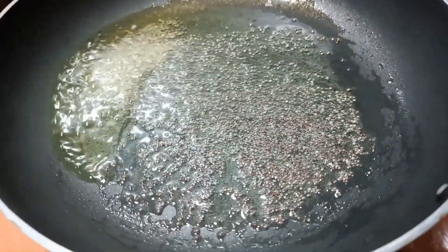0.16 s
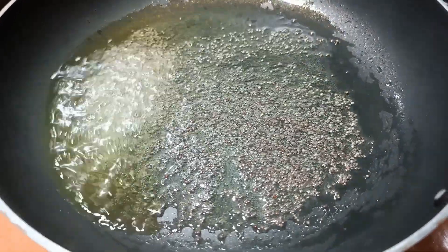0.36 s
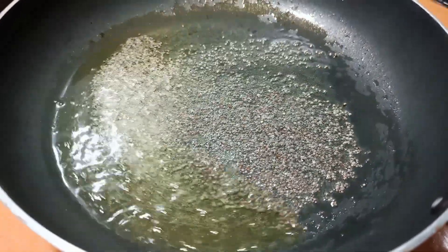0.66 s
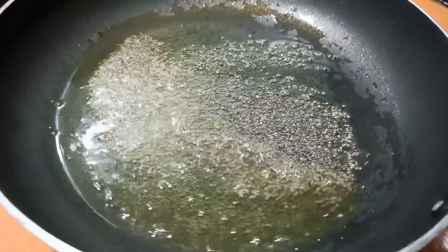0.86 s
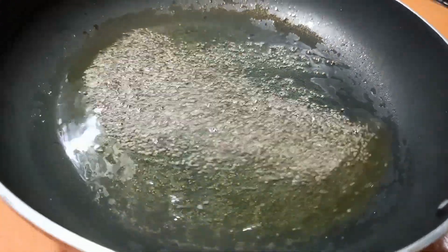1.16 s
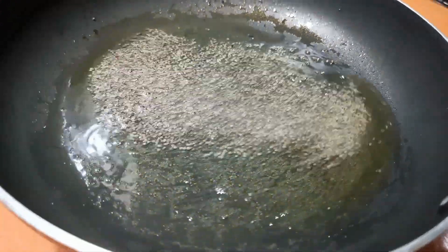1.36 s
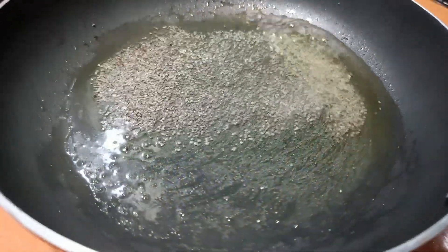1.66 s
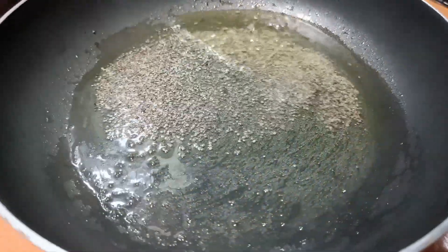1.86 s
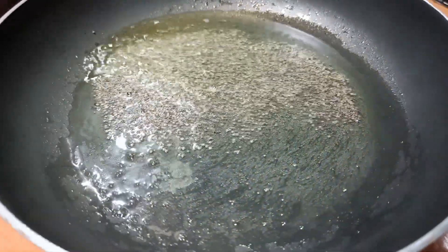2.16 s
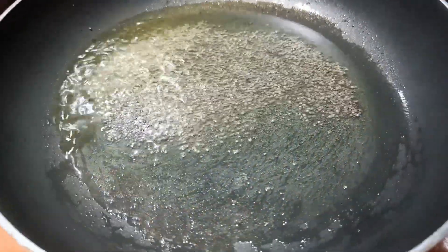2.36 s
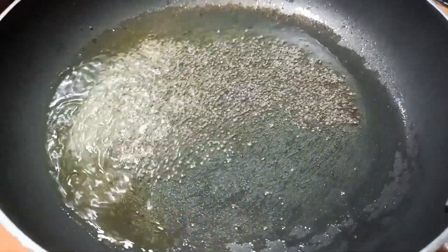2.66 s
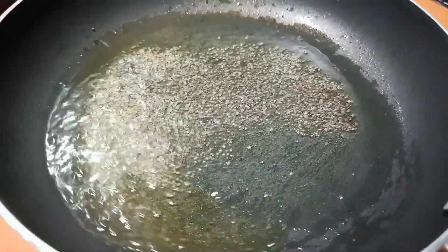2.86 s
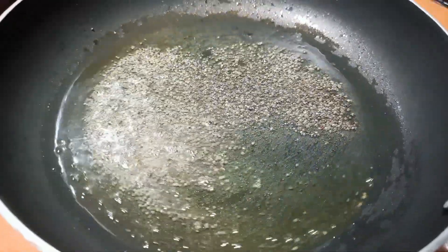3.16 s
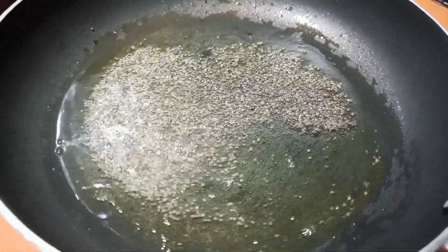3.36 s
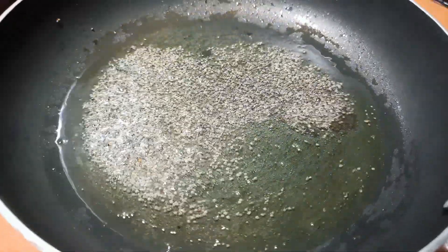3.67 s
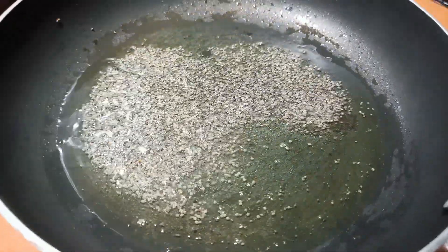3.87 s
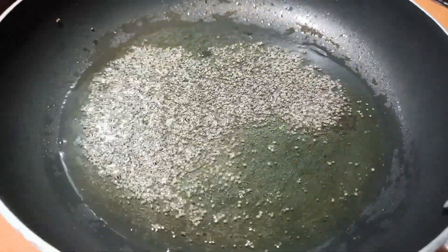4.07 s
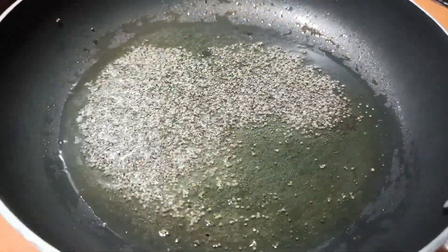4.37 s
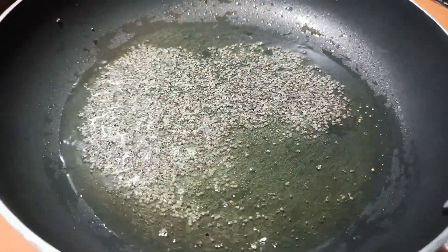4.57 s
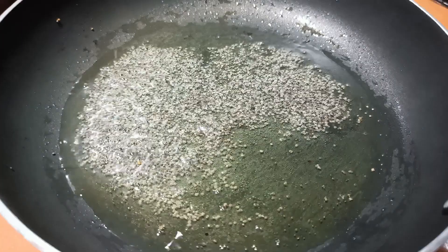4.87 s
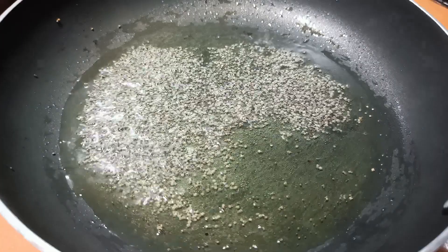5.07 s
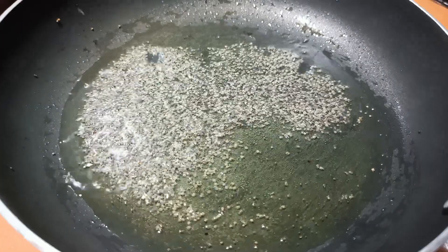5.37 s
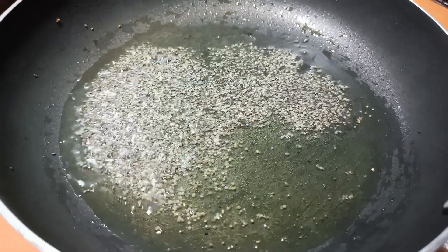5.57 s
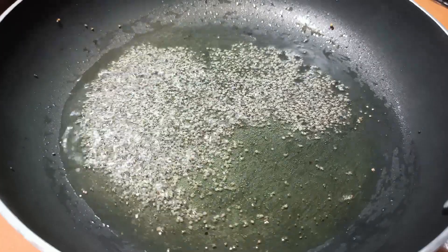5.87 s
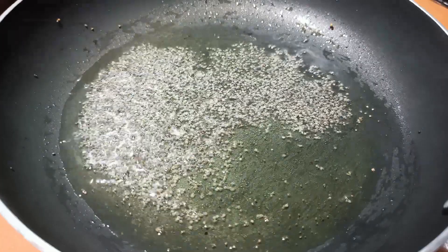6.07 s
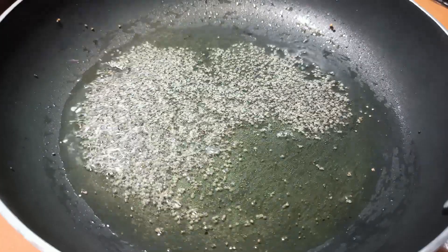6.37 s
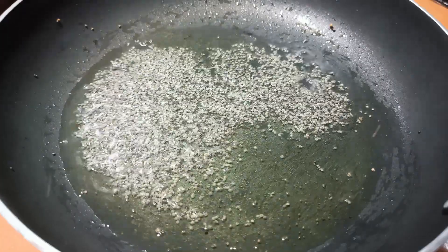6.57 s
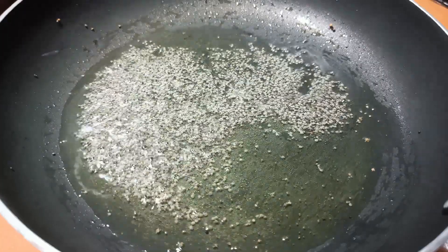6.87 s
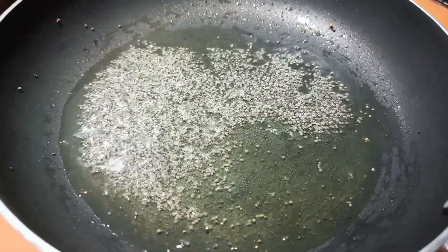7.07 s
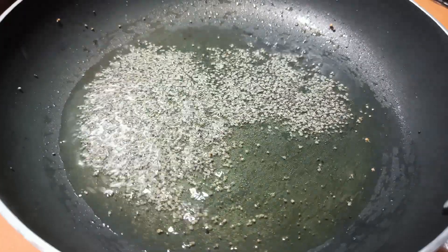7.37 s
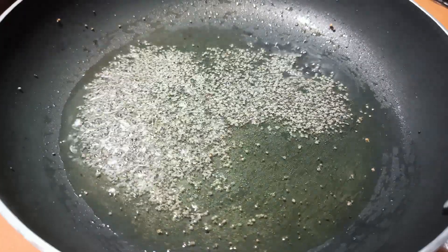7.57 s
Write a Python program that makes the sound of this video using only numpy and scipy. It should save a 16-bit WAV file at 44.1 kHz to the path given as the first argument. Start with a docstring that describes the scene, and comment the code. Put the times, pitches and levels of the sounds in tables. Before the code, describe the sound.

Mustard seeds pop in hot oil, sparse at first with pan knocks and wet plinks, then thickening into a dense, sharp crackle.

```python
"""Mustard seeds in a tilted pan

Two microphones close over a frying pan of hot oil, tilted about on the stove and then left to stand.
The pan knocks on the grate and rings in its modes; steam bubbles plink as gliding tones with noisy splashes.
Seeds burst as short coloured noise, singly at first, then in a dense crackle over a sizzle of noise grains.
The hardest bursts overload the microphones, which answer with a low thump; a small kitchen rings behind."""
import sys
import numpy as np
from scipy import signal
from scipy.fft import rfft, irfft
from scipy.io import wavfile
from scipy.ndimage import uniform_filter1d

SR = 44100
rng = np.random.default_rng(int(sys.argv[2]) if len(sys.argv) > 2 else 0)


def unload_wav(signal):
    """Save mono or channel-first audio to the path in sys.argv[1] as 16-bit WAV at rate SR, clipped to [-1, 1]."""
    wavfile.write(
        sys.argv[1],
        SR,
        np.round(np.clip(np.atleast_2d(signal).T, -1, 1) * 32767).astype(np.int16),
    )


N = 340881   # samples
SNIPPET = 4096   # samples in one short sound
MIC_LIMIT_DB = -25.5   # a push above this overloads a microphone

# seeds that burst out in front: t/s, crack level/dB before trim, crack left over right/dB, steam push/dB
BURSTS = [(0.1577, -54, 5, -55.5), (0.3126, -30, 1, -38.5), (0.3963, -30.5, -2, -32),
          (0.4623, -26.5, 7, -9), (0.495, -36.5, -8, -58), (1.0436, -35.5, 3, -42),
          (1.1571, -29, -3.5, -33.5), (1.2112, -37.5, 4, -34.5), (1.3503, -33, -2.5, -32.5),
          (1.629, -31, -3.5, -24.5), (1.7411, -31.5, 0, -29), (1.9701, -32.5, 0, -35),
          (2.0161, -32.5, 2.5, -34), (2.2461, -24, -1, -21.5), (2.6177, -41.5, -5.5, -44.5),
          (2.7848, -38, 12.5, -38.5), (2.8597, -38, 2, -33), (2.8893, -33, 0, -25),
          (2.9571, -21, -0.5, -14), (2.9813, -29, 0, -30.5), (3.0137, -25.5, -0.5, -28.5),
          (3.0484, -34, -0.5, -37.5), (3.257, -55, -0.5, -66.5), (3.4647, -56, -1.5, -54.5),
          (3.5738, -32, -4, -34), (3.9236, -51.5, 2, -63.5), (3.971, -47, 7.5, -72),
          (4.0022, -40, -1, -44.5), (4.0302, -38.5, 2, -40.5), (4.1193, -23.5, 7.5, -9.7),
          (4.2705, -26, 0, -19.5), (4.3787, -35, -4, -31), (4.411, -30, -3, -35.5), (4.456, -30, 6, -34),
          (4.4835, -23.5, 0, -22), (4.5567, -18.5, -1, -19), (4.5772, -29, 20.5, -10),
          (4.5896, -25, 1, -24), (4.6425, -29.5, 0, -8.5), (4.7495, -29.5, 3, -19.5),
          (4.8233, -19.5, 5, -26.5), (4.8467, -28.5, -5, -28), (4.92, -37, -3, -33.5),
          (5.012, -31, 7, -34.5), (5.063, -32, 7, -39.5), (5.1497, -22, 12.5, -26.5),
          (5.155, -24, 2, -32.5), (5.2237, -26, 1, -29.5), (5.2454, -20.5, 9, -10.5),
          (5.257, -27, -3, -9.5), (5.3282, -24.5, 3, -27.5), (5.3804, -29.5, 12.5, -27),
          (5.4363, -20, -5, -26), (5.4969, -32, 13.5, -28), (5.5455, -31, 0, -20.5),
          (5.6625, -23.5, 7, -29), (5.6667, -20, 7, -8), (5.6877, -19, -4, -13.5), (5.7212, -26, 10, -11.5),
          (5.7596, -22, 4, -19), (5.82, -25.5, 3, -30.5), (5.8463, -21, -0.5, -19), (5.889, -29, 17, -8.5),
          (5.962, -24.5, 0.5, -12), (6.0619, -25.5, 5, -12), (6.1006, -27.5, 5, -30),
          (6.2075, -20, -2, -23.5), (6.234, -27, 1, -24), (6.2656, -27.5, 0, -25), (6.3423, -32.5, -3, -34),
          (6.3861, -24.5, 0, -24), (6.3965, -22.5, -7.5, -23.5), (6.4, -26, 9, -8.5),
          (6.459, -20, 4, -20.5), (6.4878, -26, -1, -26.5), (6.5251, -24, 2, -24), (6.5795, -19, -1, -19.5),
          (6.5952, -25, 6, -32), (6.63, -31.5, -12, -6), (6.7085, -25.5, -4, -7), (6.8125, -27, -1, -16.5),
          (6.8281, -25, -3.5, -11), (6.8562, -24.5, 1, -20.5), (6.876, -24.5, -3, -21),
          (6.9564, -31.5, 9, -37), (7.0044, -33, 5, -9.5), (7.037, -26.5, 12, -7.5),
          (7.1017, -28.5, 16, -8.4), (7.1783, -28, 7, -8.5), (7.1812, -27.5, 7, -10),
          (7.2148, -30.5, 3, -27), (7.25, -20.5, -1, -12), (7.3469, -27, 3, -33.5), (7.4136, -21, 1, -26),
          (7.437, -25.5, -0.5, -7.5), (7.445, -32, 15, -10.5), (7.5217, -22, 3, -9.6),
          (7.5787, -24, 0, -13), (7.6344, -28, -1, -32)]
# ringing modes of the pan: f/Hz, strength when knocked/dB, strength under bursts and bubbles/dB, t60/s
PAN_MODES = [(341.4, -13.5, -62, 0.29), (406, -20, -60, 0.31), (519, -16.5, -58, 0.34),
             (706, -17, -48, 0.06), (807, -13.5, -48.5, 0.28), (850, -11, -47, 0.21),
             (1250, -18, -26.5, 0.21), (1280, -6, -35, 0.24), (1413, -13.5, -47.5, 0.24),
             (1490, -16, -42, 0.077), (1932, -22, -24, 0.28), (1990, -12.5, -32.5, 0.25),
             (2306, -27.5, -53.5, 0.2), (2780, -24, -29.5, 0.36)]
# how freely the pan rings, lifted off the grate or resting on it: t/s, level/dB
FREEDOM = [(0, -6), (0.9, -11.5), (1.15, -0.5), (2.35, 3.5), (2.9, 3.5), (3.6, -20), (4.2, -8), (7.73, -14)]
# spectrum of a burst's body and of the sizzle's blips: f/Hz, relative level/dB per Hz
BODY_SPECTRUM = [(100, -8), (500, -5), (1000, -5.5), (1500, 10.5), (2300, 5), (3100, 0), (4200, 4),
                 (5400, 3), (7000, -6.5), (12000, -34)]
# spectrum of the sizzle's ticks and of a bubble's snap: f/Hz, relative level/dB per Hz
HISS_SPECTRUM = [(200, -13.5), (800, -11.5), (1500, -8.5), (3000, -11.5), (4500, -7.5), (6700, -8.5),
                 (8700, 10.5), (11000, -2.5), (12600, -1), (14000, -5.5), (15600, -5), (17000, -16)]


def from_db(db):
    """Decibels to amplitude."""
    return 10 ** (np.asarray(db) / 20)


def rms_one(x):
    """Scale to rms 1 over all samples and channels."""
    return x / np.sqrt(np.mean(x ** 2) + 1e-20)


def over_time(points, s):
    """Read a table of times and values at the given times."""
    return np.interp(s, *np.transpose(points))


def at_hz(points, hz):
    """Read a table on a log-frequency axis."""
    known_hz, values = np.transpose(points)
    return np.interp(np.log(hz + 1), np.log(known_hz), values)


def colour(x, spectrum, size=1024):
    """Causal (minimum-phase) filter with the given spectrum."""
    gain = from_db(at_hz(spectrum, np.fft.rfftfreq(size, 1 / SR)))
    cepstrum = irfft(np.log(gain))
    # folding the cepstrum onto positive time gives minimum phase
    cepstrum[1:size // 2] *= 2
    cepstrum[size // 2 + 1:] = 0
    response = irfft(np.exp(rfft(cepstrum)))
    return signal.fftconvolve(np.atleast_2d(x), response[None], axes=1)[:, :x.shape[-1]]


def stereo_noise(length, alike):
    """Two white noises that share a part of their power, from 0 (separate) to 1 (the same)."""
    shared, *own = rng.standard_normal((3, length))
    alike = np.clip(alike, 0, 1)
    return np.sqrt(alike) * shared + np.sqrt(1 - alike) * np.array(own)


def unit_attack(x, size=132):
    """Scale each row to rms 1 over its first samples (3 ms unless given)."""
    return x / np.sqrt(np.mean(x[..., :size] ** 2, axis=-1, keepdims=True) + 1e-20)


def add(out, s, sound):
    """Mix a short sound in at a time."""
    start = max(round(s * SR), 0)
    part = out[..., start:start + sound.shape[-1]]
    part += sound[..., :part.shape[-1]]


def balance(db):
    """Left and right gains that differ by this many dB."""
    return from_db(np.array([[db], [-db]]) / 2)


def pan_ring(times, blow_db, mode_db):
    """Each blow sets every mode of the pan ringing, with a strength that scatters from blow to blow."""
    out = np.zeros((2, N))
    at = (np.array(times) * SR).astype(int)
    for k, ((hz, _, _, t60), db) in enumerate(zip(PAN_MODES, mode_db)):
        scatter_db = 2 * rng.standard_normal((len(at), 2)).T
        clicks = np.zeros((2, N))
        clicks[:, at] = from_db(blow_db + db + scatter_db) * (-1) ** k
        # two-pole resonator: a decaying sine after each click
        r = from_db(-60 / (t60 * SR))
        w = 2 * np.pi * hz / SR
        out += signal.lfilter([0, np.sin(w)], [1, -2 * r * np.cos(w), r * r], clicks + 1e-18)
    return out


def heat(s):
    """How far the seeds have come to the burst at these times, 0 to 1."""
    # t/s, heat (0 = the first stray pops, 1 = full crackle)
    heating = [(0, 0), (3.75, 0.052), (3.98, 0.55), (5.1, 0.7), (5.8, 0.96), (7.73, 0.93)]
    return over_time(heating, s)


def grains(per_s, spread_db, grain_s):
    """Random bursts of decaying noise, mostly small and now and then large."""
    starts = rng.random(N) < per_s / SR
    sizes = from_db(spread_db * np.minimum(rng.exponential(1, N), 3)) * starts
    power = signal.lfilter([1], [1, -np.exp(-2 / (grain_s * SR))], sizes ** 2 + 1e-18)
    return np.sqrt(power) * stereo_noise(N, alike=.15)


def sizzle():
    """Tiny bubbles burst around the seeds: bright ticks and fewer, deeper blips, rising with heat and sloshes."""
    # tilted oil runs over bare hot metal and the sizzle swells: t/s of the peak, level/dB before mix, rise/s
    sloshes = [(2.2, -62, 0.69), (3.0, -50.5, 0.22)]
    full_db, cold_db = -52, -29   # level before mix at full heat; change at no heat
    fall_s = 0.056   # of a slosh
    t = np.arange(N) / SR
    level = from_db(full_db + cold_db * (1 - heat(t)))
    for s, db, rise_s in sloshes:
        swell = np.exp(-((t - s) / np.where(t < s, rise_s, fall_s)) ** 2)
        level = level + from_db(db) * swell
    ticks = rms_one(colour(grains(per_s=170, spread_db=7, grain_s=.0005), HISS_SPECTRUM))
    blips = rms_one(colour(grains(per_s=70, spread_db=6, grain_s=.001), BODY_SPECTRUM))
    return level * (from_db(-6) * ticks + from_db(-8) * blips)


def quiet_floor():
    """A very quiet, steady coloured noise lies under everything."""
    # f/Hz, relative level/dB per Hz
    floor_spectrum = [(20, -6), (80, 1), (200, -8.5), (500, -14.5), (1300, -12.5), (3000, -25),
                      (6500, -23.5), (8800, -17.5), (11000, -26.5), (16000, -31.5)]
    level_db = -71   # before quiet stretches are turned down
    return from_db(level_db) * rms_one(colour(stereo_noise(N, alike=.4), floor_spectrum, size=8192))


def small_pops(count=85):
    """Lesser seeds burst at random, faster and louder with heat, and one after each listed burst; rows alike."""
    rate_growth = 3.8   # e-folds of the rate from no heat to full heat
    lone_db, spread_db, cold_db = -37, 5, -21   # crack at full heat; scatter; change at no heat
    push_db, push_spread_db, side_spread_db = -4, 4, 7   # push relative to the crack; scatters
    lag_s, neighbour_db = .018, -12.5   # mean delay of a neighbour set off; relative level at full heat
    t = np.arange(0, N, 100) / SR
    due = np.cumsum(np.exp(rate_growth * heat(t)))
    loud_s, loud_db = np.transpose(BURSTS)[:2]
    lone_s = np.interp(rng.random(count), due / due[-1], t)
    set_off_s = np.minimum(loud_s + lag_s * rng.uniform(0, 2, len(BURSTS)), t[-1])
    s = np.concatenate([lone_s, set_off_s])
    size, side, push = np.clip(rng.standard_normal((len(s), 3)), -2, 2).T
    db = np.concatenate([np.full(count, lone_db), loud_db + neighbour_db])
    db = db + cold_db * (1 - heat(s)) + spread_db * size
    return np.column_stack([s, db, side_spread_db * side, db + push_db + push_spread_db * push])


def seeds(places=4):
    """A husk splits in under a millisecond, the crack bounces round the bowl; a stereo track per place in the pan."""
    # crack at each microphone: f/Hz, relative level/dB per Hz
    crack_left = [(3000, -33), (5500, -21.5), (6700, -25.5), (8000, -2.5), (8900, 4), (9800, 4),
                  (11200, -7), (12500, -1), (14000, -13), (15600, -13), (17000, -32.5)]
    crack_right = [(3000, -31.5), (5500, -8), (6700, -3.5), (8000, 1.5), (8700, 3.5), (9700, -14.5),
                   (10700, -11.5), (12600, -2), (14000, -3.5), (15500, -1.5), (17000, -15)]
    # puff of air from a burst: f/Hz, relative level/dB per Hz
    puff_spectrum = [(100, -10), (600, -7.5), (1000, -4), (1420, 4), (1900, -8.5), (3000, -18), (8000, -43)]
    crack_s, rise_s, body_s, bowl_s = 0.00061, 0.000071, 0.00028, 0.005   # time constants
    crack_db, body_db, bowl_db = 0.68, -4.0, -17   # trims; bowl relative to the first split
    puff_db, puff_growth, typical_db, rest_share = -18, 0.55, -31.5, 0.25
    out = np.zeros((places, 2, N))
    t = np.arange(SNIPPET) / SR
    pops = np.vstack([BURSTS, small_pops()])
    for k, (s, db, side_db, push_db) in enumerate(pops):
        weight_db = min(push_db, MIC_LIMIT_DB) - db
        bowl = from_db(bowl_db + 2 * rng.standard_normal()) * np.exp(-t / bowl_s)
        split = stereo_noise(SNIPPET, alike=.08) * (np.exp(-t / crack_s) + bowl)
        split = split * (1 - np.exp(-t / rise_s))
        crack = np.vstack([colour(split[0], crack_left), colour(split[1], crack_right)])
        crack = from_db(crack_db) * unit_attack(crack) * balance(side_db)
        steam = stereo_noise(SNIPPET, alike=0.093) * (np.exp(-t / body_s) + bowl)
        # the escaping steam gives one clean pressure step, reaching each microphone at its own moment
        steam[[0, 1], rng.integers(0, 10, 2)] += 2.4
        body = unit_attack(colour(steam, BODY_SPECTRUM)) * balance(0.23 * side_db - 2.5)
        body = from_db(weight_db + body_db) * body
        # bigger bursts push more air and sound deeper, most of all once the pan rests and the oil lies still
        air_db = puff_db + puff_growth * (db - typical_db) - rest_share * over_time(FREEDOM, s)
        puff = from_db(air_db) * unit_attack(colour(steam, puff_spectrum))
        add(out[k % places], s, from_db(db) * (crack + body + puff))
    s, db, _, push_db = pops.T
    weight_db = np.minimum(push_db, MIC_LIMIT_DB) - db
    blow_db = db + .5 * weight_db + over_time(FREEDOM, s) - 2.5
    out[0] += pan_ring(s, blow_db, np.array(PAN_MODES)[:, 2])
    return out


def kitchen(x, size=26000):
    """A scattered echo from the wall behind the stove, then a diffuse tail that dies band by band."""
    # tail of the room: f/Hz, relative level/dB
    room_spectrum = [(60, -15), (200, 3.5), (700, 0), (1500, -8.5), (3000, 3), (6000, 2.5), (9000, 3.5),
                     (16000, 1)]
    # f/Hz, t60/s
    room_t60 = [(100, 0.46), (600, 0.48), (1500, 0.47), (4000, 0.3), (9000, 0.46), (16000, 0.28)]
    build_s, wall_s, wall_spread_s = 0.0039, 0.0069, 0.0026
    tail_db, wall_db = -12.0, -16
    t = np.arange(size) / SR
    edges = np.geomspace(60, 17000, 10)   # Hz
    white = rng.standard_normal((2, 2, size))
    tail = 0
    for k, (low, high) in enumerate(zip(edges, edges[1:])):
        bandpass = signal.butter(2, [low, high], "band", fs=SR, output="sos")
        band = signal.sosfilt(bandpass, white[k % 2])   # neighbouring bands use separate noises
        hz = np.sqrt(low * high)
        decay = np.exp(-np.log(1000) * t / at_hz(room_t60, hz))
        tail = tail + band * from_db(at_hz(room_spectrum, hz)) * decay
    tail = tail * (1 - np.exp(-t / build_s))
    wall = rng.standard_normal((2, size)) * np.exp(-abs(t - wall_s) / wall_spread_s)
    response = from_db(tail_db) * rms_one(tail) + from_db(wall_db) * rms_one(wall)
    return signal.fftconvolve(x, response / np.sqrt(size), axes=1)[:, :N]


def overload_thumps():
    """An overloaded microphone jumps off centre, leaks back, and swings to rest: the harder, the slower."""
    jump, leak_s = 0.72, 0.0013   # times and swing pitch hold at an excess of 1
    swing, swing_hz, swing_s = .25, 22, .021
    slap_level, slap_hz, slap_s = 0.42, 1350, 0.00044
    overload_db, growth, delay_s, other_share = 10.0, .4, 0.00025, 0.06
    out = np.zeros((2, N))
    t = np.arange(2 * SNIPPET) / SR
    signs = rng.choice([-1, 1], len(BURSTS))
    for (s, _, side_db, push_db), sign in zip(BURSTS, signs):
        excess = from_db(overload_db) * max(from_db(push_db) - from_db(MIC_LIMIT_DB), 0)
        age = t / max(excess, .05) ** growth
        recovery = jump * np.exp(-age / leak_s)
        recovery = recovery - swing * np.exp(-age / swing_s) * np.sin(2 * np.pi * swing_hz * age)
        # the same pressure front slaps the air in the pan for about one cycle
        slap = slap_level * np.exp(-t / slap_s) * np.sin(2 * np.pi * slap_hz * t)
        # the choked microphone misses part of the crack, so the thump lies on the crack's weaker side
        sides = [-other_share, 1] if side_db > 0 else [1, -other_share]
        add(out, s + delay_s, sign * excess * np.outer(sides, recovery + slap))
    return signal.sosfilt(signal.butter(1, 3000, fs=SR, output="sos"), out)


def knocks():
    """The pan's base meets the grate: a dull blow, a short rattle, and pan modes; soft blows miss the high ones."""
    # t/s, level/dB before trim, brightness f/Hz
    blows = [(0.5757, -13.5, 2410), (0.7968, -40.5, 1770), (1.364, -30.5, 1250), (1.9089, -19, 2270),
             (1.917, -21, 1880), (2.923, -19, 2420), (3.678, -44.5, 1380), (3.718, -52, 1300)]
    # f/Hz, relative level/dB per Hz
    blow_spectrum = [(60, -31), (170, -16), (320, -14.5), (520, 0), (750, 1), (1000, -4.5), (1300, 2.5),
                     (1700, -16), (2050, -2.5), (2600, -16.5), (4000, -20.5), (12000, -18.5)]
    contact_s, rattle_s, rattle_db = 0.0036, 0.034, -11
    blow_db, ring_db = -3, -6   # trims
    out = np.zeros((2, N))
    t = np.arange(SNIPPET) / SR
    for s, db, bright_hz in blows:
        envelope = np.exp(-t / contact_s) + from_db(rattle_db) * np.exp(-t / rattle_s)
        blow = colour(stereo_noise(SNIPPET, alike=0.57) * envelope, blow_spectrum)
        blow = signal.sosfilt(signal.butter(2, bright_hz, fs=SR, output="sos"), blow)
        add(out, s, from_db(db + blow_db) * unit_attack(blow, size=441))   # level over 10 ms
    s, db, bright_hz = np.transpose(blows)
    mode_hz, mode_db = np.transpose(PAN_MODES)[:2]
    softness_db = 10 * np.log10(1 + (mode_hz[:, None] / bright_hz) ** 4)
    return out + pan_ring(s, db + ring_db, mode_db[:, None] - softness_db)


def bubbles():
    """A steam bubble opens with a snap and rings at its own pitch, rising slightly; low bubbles ring longer."""
    # clearest bubbles in the oil: t/s, level/dB before mix, left over right/dB, starting pitch f/Hz
    plinks = [(1.212, -31, -2.5, 4700), (1.2725, -37, -7.5, 4700), (1.571, -39, -0.5, 3850),
              (1.7417, -30.5, -6.5, 2760), (1.7907, -23.5, -7, 4620), (1.7961, -17, 1, 2764),
              (1.9458, -24.5, -3.5, 2796), (2.099, -24.5, -3.5, 3670), (2.2791, -31.5, -6, 3970),
              (2.3497, -36.5, 2, 3850), (2.857, -34.5, -2.5, 2910), (2.8917, -31, 5, 2060),
              (3.3583, -49, 0, 2780), (3.389, -48.5, -0.5, 4260), (4.9202, -30, 5, 5200),
              (5.052, -34, -6, 4040), (5.747, -36, 4, 3400), (6.323, -34.5, -2, 3380),
              (7.291, -33.5, 2, 3410)]
    ring_s, rise_s, splash_s = 0.0037, 0.00089, 0.0026   # ring_s at 3000 Hz
    ring_db, splash_db, snap_db, pan_db = 0, -2, -13, -7
    glide, resonance_db, detune_hz = 1.1, 12, 160
    out = np.zeros((2, N))
    t = np.arange(SNIPPET) / SR
    for s, db, side_db, hz in plinks:
        phase = 2 * np.pi * (hz * t * (1 + glide * t) + np.array([[0], [.2]]))
        envelope = np.exp(-t / ring_s * (hz / 3000) ** 2) * (1 - np.exp(-t / rise_s))
        purity = 1 / (1 + (hz / 3900) ** 6)   # small, high bubbles are mostly splash
        ring = purity * unit_attack(np.sin(phase) * envelope)
        burst = stereo_noise(SNIPPET, alike=0.11) * np.exp(-t / splash_s)
        around_pitch = signal.butter(3, [hz * 0.66, hz * 1.53], "band", fs=SR, output="sos")
        splash = unit_attack(signal.sosfilt(around_pitch, burst))
        snap = unit_attack(colour(burst * np.exp(-t / splash_s), HISS_SPECTRUM))
        plink = from_db(ring_db) * ring + from_db(splash_db) * splash + from_db(snap_db) * snap
        add(out, s, from_db(db) * balance(side_db) * plink)
    s, db, _, hz = np.transpose(plinks)
    mode_hz, _, mode_db, _ = np.transpose(PAN_MODES)
    # a bubble drives a mode of the pan much harder when their pitches meet
    detuning = (mode_hz[:, None] - hz) / detune_hz
    drive_db = mode_db[:, None] + resonance_db / (1 + detuning ** 2)
    return out + pan_ring(s, db + pan_db + over_time(FREEDOM, s), drive_db)


def suppressor(x, threshold_db=-60, slope=0.83, depth_db=6, size=900):
    """Sound that sinks under a threshold is turned down further, which shortens the last of each tail."""
    power = uniform_filter1d(np.mean(x ** 2, axis=0), size)
    level_db = 10 * np.log10(np.maximum(power, 1e-12))
    return x * from_db(np.clip(slope * (level_db - threshold_db), -depth_db, 0))


def scene():
    """Each place in the pan reaches the walls by its own paths; thumps and floor stay out of the room."""
    places = seeds()
    places[0] += sizzle() + knocks() + bubbles()
    in_room = sum(place + kitchen(place) for place in places)
    return in_room + overload_thumps() + quiet_floor()


def record(dry):
    """Quiet stretches are turned down, peaks are clipped near full scale, the top is cut."""
    clipped = np.clip(suppressor(dry), -.92, .92)
    # 60 dB down from 17 kHz up
    return signal.sosfilt(signal.cheby2(14, 60, 17000, fs=SR, output="sos"), clipped)


dry = scene()
out = record(dry)
unload_wav(out)
```